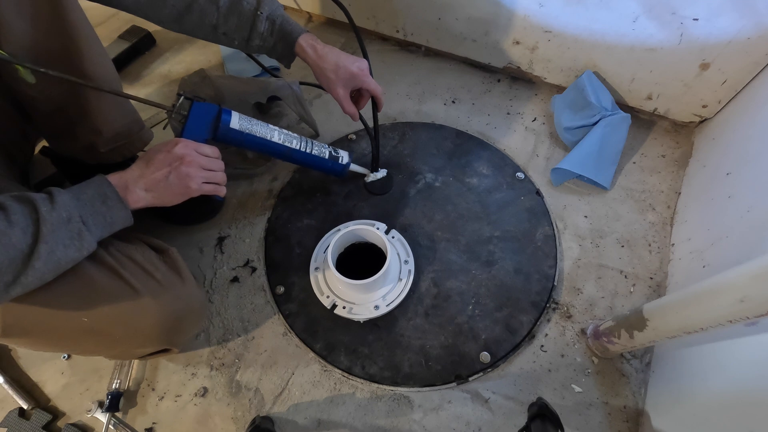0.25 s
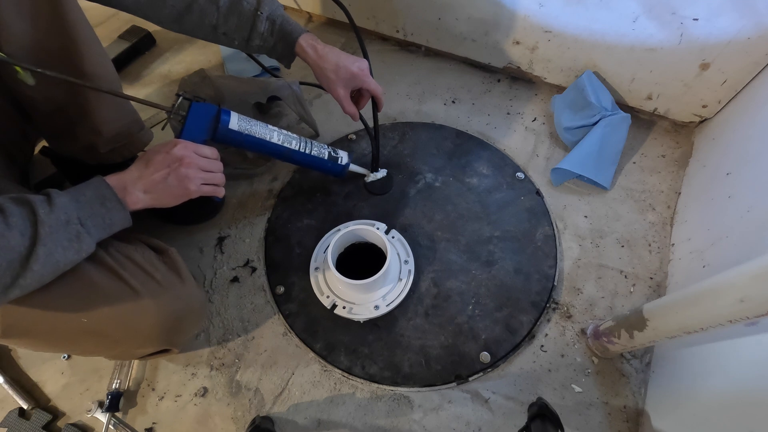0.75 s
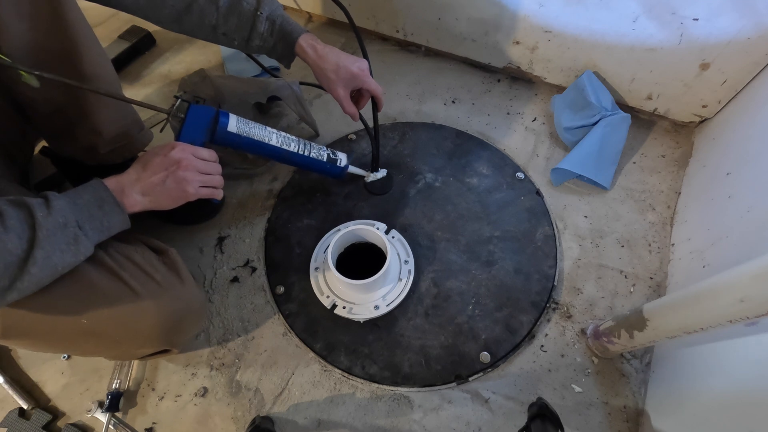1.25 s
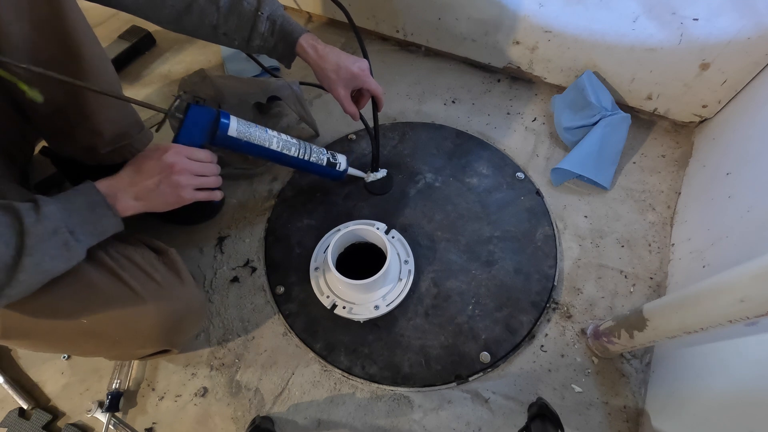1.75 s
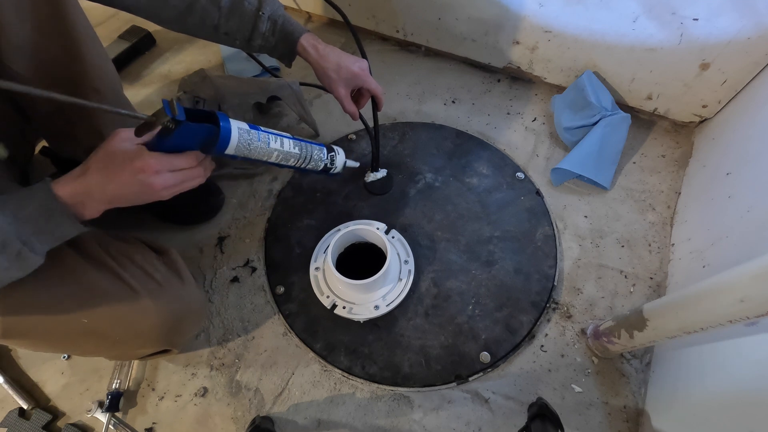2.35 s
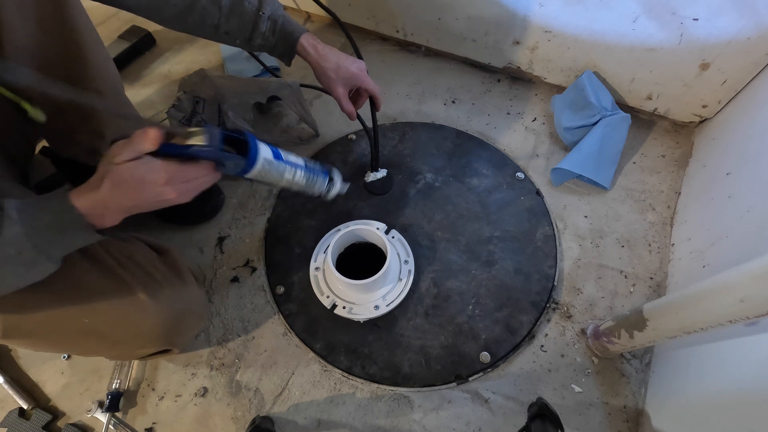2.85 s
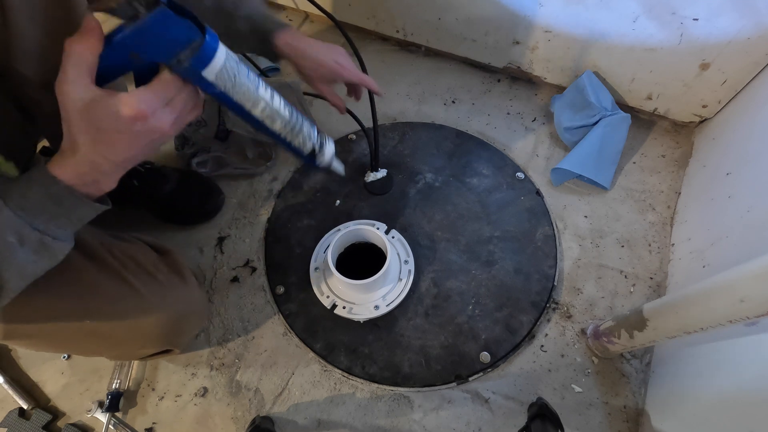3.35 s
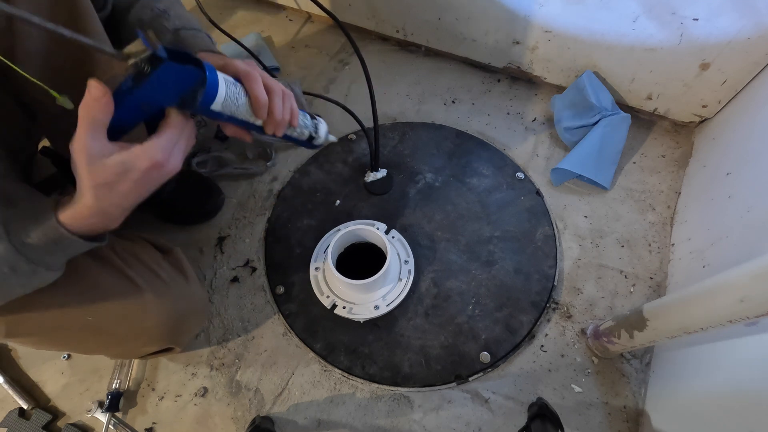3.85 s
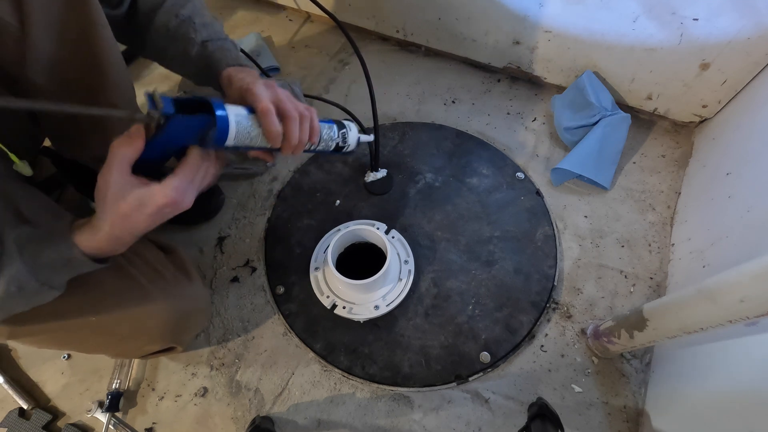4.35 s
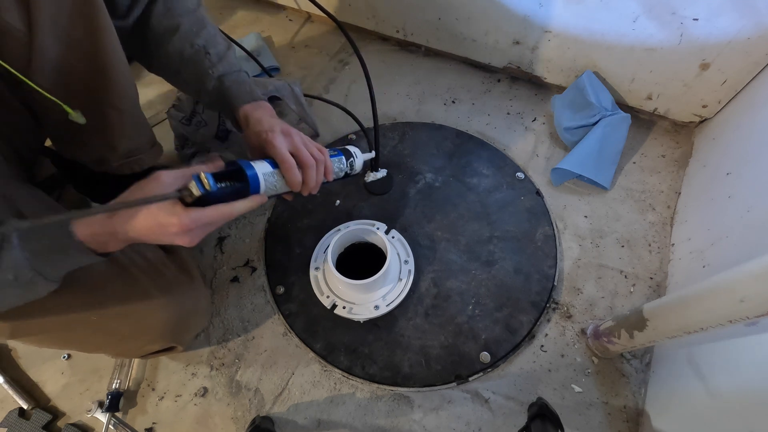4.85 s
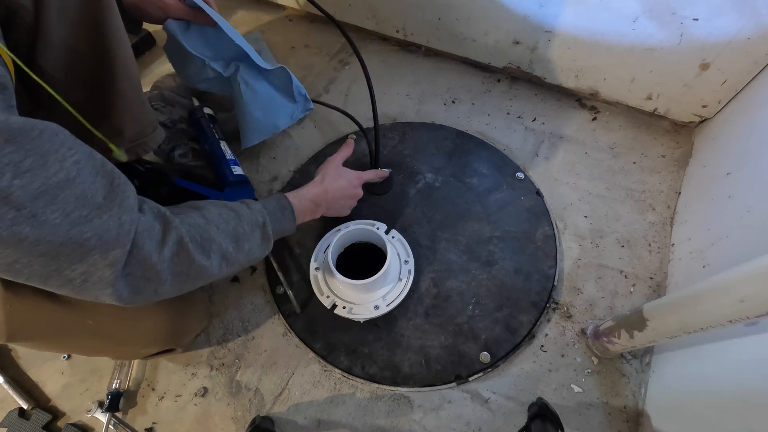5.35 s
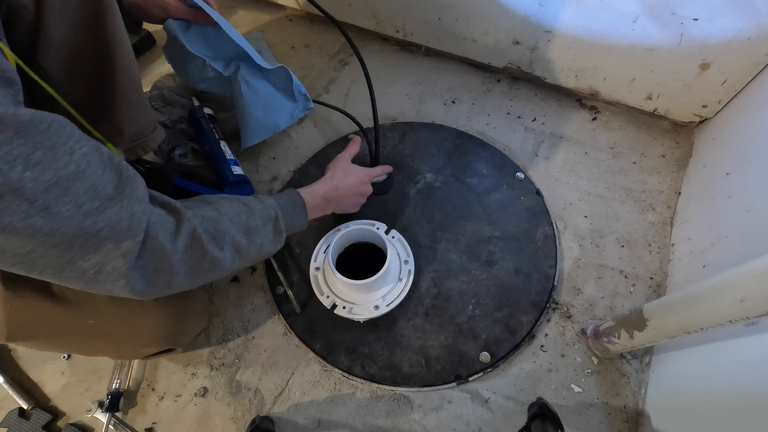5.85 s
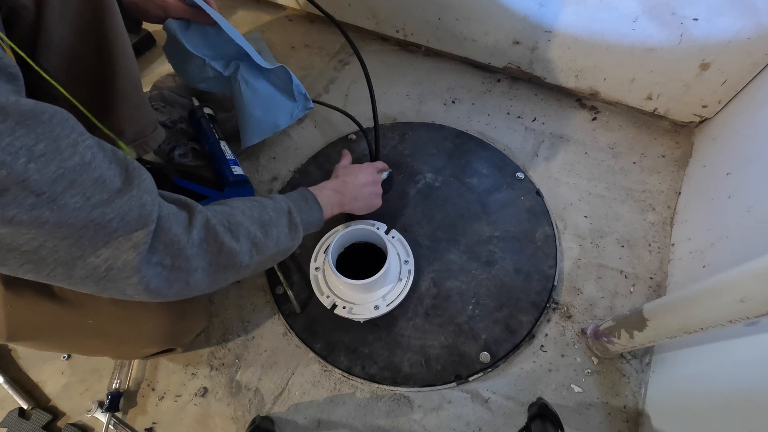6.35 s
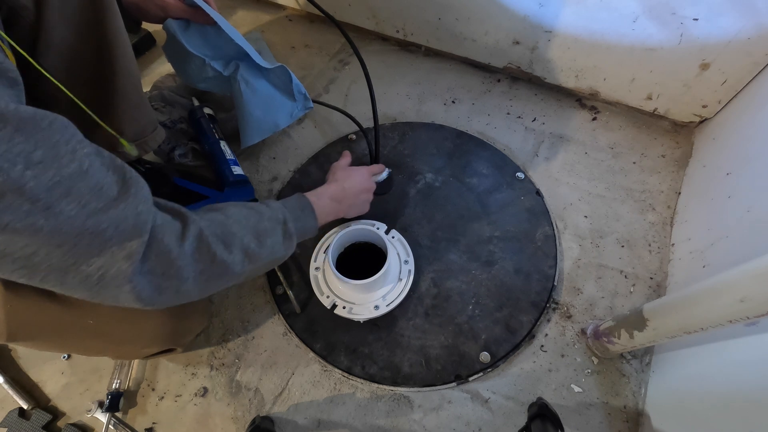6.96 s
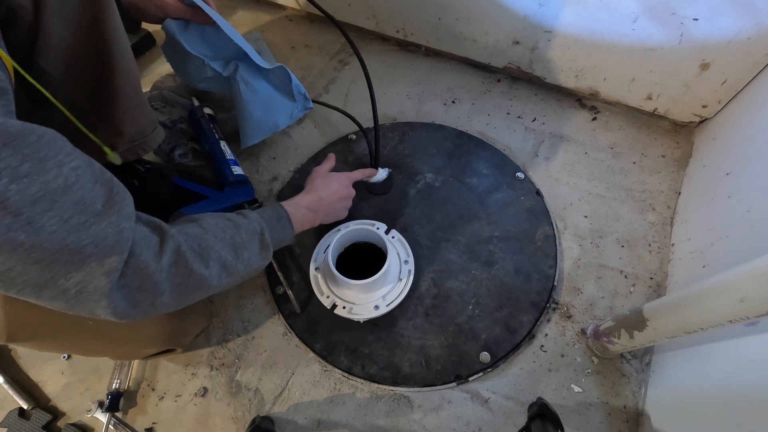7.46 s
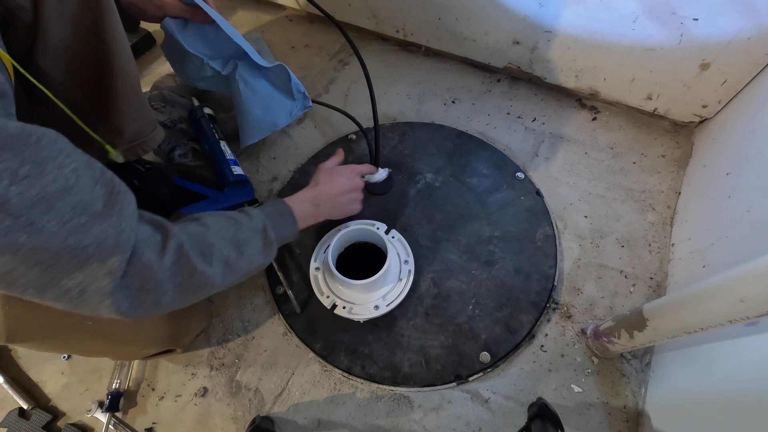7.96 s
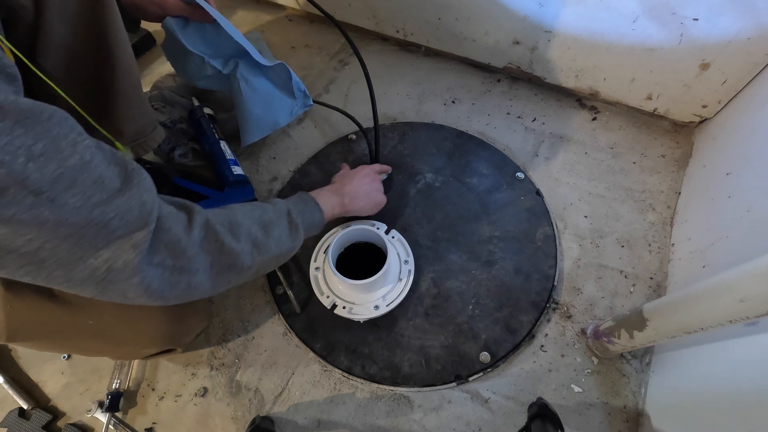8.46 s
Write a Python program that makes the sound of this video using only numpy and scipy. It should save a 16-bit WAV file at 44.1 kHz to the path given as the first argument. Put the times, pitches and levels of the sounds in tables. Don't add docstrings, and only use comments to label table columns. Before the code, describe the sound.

Unsteady low rumble with faint hiss fills a small bare space throughout, heard close up in stereo. During the first 1.6 seconds there are only barely audible ticks and fading cloth rub. At about 1.7 a small steel click sounds, with more light ticks near 1.8 and 2.0 to 2.1 and soft scuffing. Rubbing and metal drag swell towards 2.9, then at 3.0 the gun bumps the hollow lid: a deep, rounded boom with a dull knock. A scrape and tick follow at 3.16, a short skin swish at 3.6 to 3.7, and faint clicks to 4.1. At 4.43 the release lever snaps, by far the sharpest and loudest event, with a low jolt and bright rod jangle; a rebound clacks at 4.63 and smaller ticks settle. At 4.87 everything cuts abruptly to rumble, with tiny ticks around 6.1 to 6.9 and a slightly clearer one at 7.6, ending near 8.7.

```python
import sys
import numpy as np
from scipy import signal
from scipy.fft import rfft, irfft, next_fast_len
from scipy.io import wavfile
from scipy.ndimage import map_coordinates

SR = 44100
rng = np.random.default_rng(int(sys.argv[2]) if len(sys.argv) > 2 else 0)


def to_wav(sig):
    pcm = np.clip(np.atleast_2d(sig), -1, 1) * 32767
    pcm = np.round(pcm).astype(np.int16)
    wavfile.write(sys.argv[1], SR, pcm.T)


def makeup_ratio(level_db):
    decades = np.asarray(level_db, float) / 20
    return 10 ** decades


N = 384111
CHANGE_S = 4.868


def unit(x):
    return x / np.sqrt(np.mean(x ** 2) + 1e-20)


def along(points, hz):
    f, v = np.transpose(points)
    return np.interp(np.log(hz + 1), np.log(f + 1), v)


def wobble(rate):
    knots = rng.standard_normal(int(N * rate / SR) + 4)
    return map_coordinates(knots, [np.arange(N) * rate / SR])


def filtered(x, response):
    n = x.shape[-1]
    m = next_fast_len(n + 8192)
    return irfft(rfft(x, m) * response(np.fft.rfftfreq(m, 1 / SR)), m)[..., :n]


def body(peaks):
    def response(f):
        total = 0
        for k, (centre, width, db) in enumerate(peaks):
            resonance = 1j * f * width / (centre * centre - f * f + 1j * f * width)
            total = total + (-1) ** k * makeup_ratio(db) * resonance
        return total
    return response


def bands(peaks):
    def response(f):
        power = 0
        for centre, width, db in peaks:
            power = power + makeup_ratio(2 * db) / (1 + (2 * (f - centre) / width) ** 2) ** 1.5
        return np.sqrt(power)
    return response


def noise(response, alike, size=N):
    def mid_side(hz):
        turn = np.arccos(np.clip(along(alike, hz), -1, 1)) / 2
        return response(hz) * [np.cos(turn), np.sin(turn)]
    mid, side = filtered(rng.standard_normal((2, size)), mid_side)
    return unit(np.array([mid + side, mid - side]))


def coloured(points):
    return lambda f: makeup_ratio(along(points, f))


def add(out, s, x):
    i = round(s * SR)
    out[:, i:i + x.shape[-1]] += np.atleast_2d(x)[:, :N - i]


def ring(modes, t, attack, scale=1):
    sines = 0
    for hz, db, t60 in modes:
        sines = sines + makeup_ratio(db - 60 * t / (t60 * scale)) * np.sin(2 * np.pi * hz * t)
    return sines * (1 - np.exp(-t / attack))


def stroke(peak_s, db, swell_s, fade_s):
    late = np.arange(N) / SR - peak_s
    return makeup_ratio(db - 20 * np.where(late < 0, -late / swell_s, late / fade_s))


# start_s, level_db, edge_db (re knock), pitch_hz
LEVER_TAPS = [(0.099, -68, 5, 1040), (0.175, -56.5, -22, 2820), (0.344, -58.5, -21, 774),
              (0.434, -68, 7, 751), (1.716, -33.5, 0.5, 1630), (1.806, -42.5, -4.5, 2100),
              (2.014, -40, 3, 2820), (2.044, -50, -1, 2160), (2.062, -51, 3, 2150), (2.115, -47, -5, 2460),
              (3.163, -39.5, -2, 2770), (3.479, -71, 8, 830), (3.514, -66.5, -17, 2050),
              (3.602, -66, 1, 1070), (3.777, -49.5, -21, 2240), (3.837, -55, 3, 2260),
              (4.066, -42, -15, 2250), (4.677, -25, -3.5, 1162), (4.785, -45, -11, 886),
              (6.099, -73.5, 10, 2100), (6.251, -74, 12, 2100), (6.389, -65, -18.5, 888),
              (6.929, -79, 11, 2100), (7.631, -55.5, -11, 1450)]
# start_s, level_db, edge_db, pitch_hz, t60_s
ROD_KNOCKS = [(1.669, -35.5, -11.5, 1410, .021), (1.688, -52.5, -5, 880, .025), (4.404, -45, -4, 2100, .02),
              (4.415, -30, -3, 2000, .05), (4.4215, -12.5, -7, 904, 0.025), (4.4237, -17, -3, 1210, .02),
              (4.4261, -17.5, 17, 900, .009), (4.4272, -17, 16, 2050, .009), (4.430, -17, 2.5, 2050, .022),
              (4.4405, -30, 3, 2097, .03), (4.629, -16.5, -5, 2110, .016), (4.6298, -24, -6, 4120, .014),
              (4.6394, -24, -12, 2110, .02), (4.656, -36, -9, 2110, .04), (4.797, -36.5, -10, 3120, .022)]
# pitch_hz, width_hz, level_db
FRAME_MODES = [(775, 80, -4), (904, 60, -3), (1210, 80, -4), (1460, 110, -3), (1630, 90, -3), (2110, 80, 0),
               (2250, 130, -4), (2460, 150, -5), (2820, 110, -3), (3060, 120, -4), (3280, 130, -7),
               (4120, 160, -9)]
# pitch_hz, width_hz, level_db
PLATE_MODES = [(4600, 250, -8.5), (5110, 310, -3), (6820, 800, 1.5), (7950, 270, -10), (8900, 500, -13.5),
               (11170, 900, -15), (12600, 1300, -15)]
TAP_T60_S, LEVER_HZ, GUIDE_HZ = 0.031, 2135.5, 2900
SHARED_DB = -4
BLOW = 1.2
PLATE_TOP_HZ = 14800


def steel_contacts():
    out, t = np.zeros((2, N)), np.arange(SR // 8) / SR
    contacts = [(*row, TAP_T60_S, LEVER_HZ) for row in LEVER_TAPS]
    contacts += [(*row, GUIDE_HZ) for row in ROD_KNOCKS]

    def plates(f):
        u = f / PLATE_TOP_HZ
        return body(PLATE_MODES)(f) / (1 - u ** 2 + 1.3j * u) ** 2

    for s, db, edge_db, hz, t60, shared_hz in contacts:
        burst = rng.standard_normal((3, len(t))) * makeup_ratio(-60 * t / t60) * (1 - np.exp(-t / 0.00013))
        near = []
        for centre, width, level in FRAME_MODES:
            own_db = -30 * abs(np.log2(centre / hz))
            common_db = SHARED_DB - 27 * abs(np.log2(centre / shared_hz))
            near.append((centre, width, level + max(own_db, common_db)))

        def frame(f):
            notes = body(near)(f) + body([(2100, 2200, -19)])(f)
            return notes / (1 + 1j * f / 5500) ** 3 * (f / (f - 520j)) ** 4

        knock = filtered(burst[0] + BLOW * np.linalg.norm(burst[0]) * (t == 0), frame)
        crack = burst[1] + .6 * np.linalg.norm(burst[1]) * (t == 0)
        edge = filtered(crack * makeup_ratio([[1.5], [-1.5]]) + .22 * burst[2] * [[1], [-1]], plates)
        knock = makeup_ratio([[.4], [-.4]]) * knock / abs(knock).max()
        edge = makeup_ratio(edge_db) * edge / abs(edge).max()
        add(out, s, makeup_ratio(db) * (knock + edge))
    return out


# start_s, level_db
SETTLING = [
    (4.428, -34.5),
    (4.46, -40),
    (4.55, -44),
    (4.622, -48.5),
    (4.701, -58),
    (4.78, -75.5),
]
# pitch_hz, width_hz, level_db
CHATTER_BANDS = [(975, 50, -4), (1720, 60, -2), (2050, 250, -2), (2600, 350, -3), (3500, 1200, -11.5),
                 (4750, 260, 0), (5370, 140, 0.5), (6100, 600, -7), (6897, 446, -1.5), (7500, 400, -8),
                 (8900, 630, -11.5), (11000, 495, -18), (12300, 1497, -21)]
# pitch_hz, level_db, t60_s
ROD_MODES = [(980, -10, 0.91), (1710, -6, 0.74), (2110, 0, 0.32), (2245, -3.5, 0.44), (2570, -2.5, 0.41),
             (3940, -15, 0.59), (4818, -15, 8.5), (5470, -7, 3.6), (5852, -8, 0.54), (6702, -11, 5.0),
             (6923, -3.5, 0.48), (7192, -11.5, 0.8), (8441, -16.5, 0.46), (8800, -13, 0.54),
             (11084, -12, 0.22), (11890, -17.5, 0.35)]


def rod_jangle():
    s, db = np.transpose(SETTLING)
    out, t = np.zeros((2, N)), np.arange(round((s[-1] - s[0]) * SR)) / SR
    chatter = noise(bands(CHATTER_BANDS), [(1000, 0.94), (9000, 0.82)], size=len(t))
    chatter = makeup_ratio(2.6 * wobble(220)[:len(t)]) * chatter
    level = makeup_ratio(np.interp(t + s[0], s, db) + [[1.1], [-1.1]])
    add(out, s[0], level * (chatter + makeup_ratio(-5) * ring(ROD_MODES, t, .002, 3)))
    return out


# start_s, pitch_hz, level_db, t60_s
SPRING_NOTES = [
    (3.163, 13100, -68, .25),
    (4.395, 7950, -44, .3),
    (4.43, 975, -52, .9),
]


def spring():
    out, t = np.zeros((2, N)), np.arange(SR // 2) / SR
    for s, hz, db, t60 in SPRING_NOTES:
        add(out, s, ring([(hz, db, t60)], t, .012))
    return out


# start_s, pitch_hz, level_db, t60_s, rise_s
BOOM_NOTES = [
    (3.002, 58, -5, 0.289, 0.0073),
    (3.0195, 38, -11, 0.4, 0.0088),
    (3.002, 116, -16.5, 0.13, 0.0028),
    (3.002, 334, -38.5, 0.32, 0.0021),
    (3.092, 44.5, -22.5, 0.31, .01),
    (0.38, 770, -56, .08, .002),
]


def booms():
    out, t = np.zeros((2, N)), np.arange(SR // 2) / SR
    for s, hz, db, t60, rise in BOOM_NOTES:
        add(out, s, ring([(hz, db, t60)], t, rise))
    return out


# start_s, level_db, t60_s
LID_BLOWS = [
    (2.997, -25, 0.038),
    (3.010, -22, 0.044),
    (3.02, -37.5, 0.25),
]
# pitch_hz, width_hz, level_db
LID_MODES = [(332.5, 17, -4.5), (486, 35, 4), (932, 58, -7), (1110, 90, -12), (1303, 94, -9),
             (1895, 160, -18), (2520, 390, -20.5), (5200, 720, -25)]


def lid_thuds():
    out, t = np.zeros((2, N)), np.arange(SR // 2) / SR
    for s, db, t60 in LID_BLOWS:
        puff = noise(np.ones_like, [(500, 0.92)], size=len(t)) * makeup_ratio(-60 * t / t60)
        puff = filtered(puff, lambda f: body(LID_MODES)(f) / (1 + 1j * f / 6000) ** 2)
        add(out, s, makeup_ratio(db + 4.5) * puff / abs(puff).max())
    return out


# start_s, level_db, rise_s, left_right_db
JOLTS = [
    (4.4285, -2, .0011, -8),
]


def jolt():
    out, t = np.zeros((2, N)), np.arange(SR // 2) / SR
    for s, db, rise, pan_db in JOLTS:
        u = t / rise
        push = u ** 2 * (1 - .27 * u) * np.exp(-u)
        add(out, s, makeup_ratio(db + pan_db * np.array([[.5], [-.5]])) * push)
    return out


# peak_s, rub_db, brush_db (re rub), swell_s, fade_s
RUB_STROKES = [(0.0, -75, -2.3, .1, .34), (0.92, -85, 0.5, 0.22, .4), (1.712, -60, -4.5, 0.071, .25),
               (1.9, -68, -1, .3, .55), (2.1, -64, -5.5, 0.64, .4), (2.44, -75, -3, 1.2, .06),
               (2.67, -82.5, 4.5, .04, .6), (2.864, -66, 4, .22, .45), (2.96, -67, 0, 0.33, .06),
               (3.04, -57, -13, .03, .08), (3.158, -56, -5, .04, .03), (3.175, -70.5, -1, .12, .11),
               (3.49, -86, 8, 0.17, .6), (3.76, -76.5, -2, 0.13, 1.8), (4.25, -72.5, 2.5, 0.056, 1.2),
               (4.39, -68, 1.5, 0.31, .04), (4.715, -69, -10, 0.027, .15), (4.81, -72, 0.35, .2, .22),
               (8.7, -86, 2.5, .45, .1)]
# pitch_hz, level_db
SCUFF_COLOUR = [(440, -41), (750, -11), (851, -11.5), (1350, -0.5), (1510, -8), (2040, -2.5), (3400, -16.5),
                (4420, -44.5), (7480, -120)]
# pitch_hz, level_db
BRUSH_COLOUR = [(1760, -32), (3000, -3.5), (3540, -8.5), (4790, -2.5), (6450, -3.5), (7020, -1), (8170, -9),
                (12300, -16.5), (13100, -19.5), (14500, -33)]


def rubbing():
    t, near = np.arange(N) / SR, [(1000, .75), (9000, .65)]
    dull = noise(coloured(SCUFF_COLOUR), near) * makeup_ratio(2.2 * wobble(120) + 1.1 * wobble(25))
    bright = noise(coloured(BRUSH_COLOUR), near) * makeup_ratio(2.2 * wobble(160) + 1.5 * wobble(30))
    rub, brush = np.zeros(N), np.zeros(N)
    for s, db, brush_db, swell_s, fade_s in RUB_STROKES:
        same_side = (t < CHANGE_S) == (s < CHANGE_S)
        power = (stroke(s, db, swell_s, fade_s) * same_side) ** 2
        rub += power
        brush += power * makeup_ratio(2 * brush_db)
    return np.sqrt(rub) * dull + np.sqrt(brush) * bright


# peak_s, level_db, swell_s, fade_s
DRAG_STROKES = [(2.82, -69, .18, .15), (2.868, -54.5, 0.048, .09), (2.895, -56, .05, .06),
                (2.96, -58.5, .12, 0.034), (3.168, -48, 0.042, 0.029), (3.19, -68, .03, 0.081),
                (2.03, -60.5, 0.022, 0.11), (3.785, -66, .005, 0.037), (3.85, -71, .01, .08),
                (4.075, -57.5, .005, 0.067)]


def drag():
    note = noise(bands([(2123, 120, -0.5), (2590, 510, -11.0)]), [(2000, 0.76)])
    return np.sqrt(sum(stroke(*row) ** 2 for row in DRAG_STROKES)) * note


# start_s, level_db, centre_hz
PALM_SLIDE = [
    (3.595, -94, 6060),
    (3.627, -57, 6122),
    (3.699, -59, 5392),
    (3.715, -66.5, 5300),
    (3.77, -82, 5600),
]


def swish():
    s, db, centre_hz = np.transpose(PALM_SLIDE)
    out, t = np.zeros((2, N)), np.arange(s[0], s[-1], 1 / SR)
    upper = [(7900, 2500, -8), (11500, 3500, -10)]
    open_palm = noise(bands([(6000, 900, 0)] + upper), [(6000, .7)], size=len(t))
    shut_palm = noise(bands([(5200, 1100, 0), (4000, 900, -7)] + upper), [(6000, .7)], size=len(t))
    closed = np.clip((6200 - np.interp(t, s, centre_hz)) / 900, 0, 1)
    grain = 1.3 * wobble(90)[:len(t)]
    level = makeup_ratio(np.interp(t, s, db) + grain + [[.8], [-.8]])
    add(out, s[0], level * (np.sqrt(1 - closed) * open_palm + np.sqrt(closed) * shut_palm))
    return out


# pitch_hz, t60_s
WALL_DECAY = [(300, .35), (2000, 0.35), (6000, .25), (13000, .12)]


def room(x):
    hz, t, z = signal.stft(rng.standard_normal((2, SR // 2)), SR, nperseg=256)
    decay = makeup_ratio(-60 * t / along(WALL_DECAY, hz)[:, None])
    tail = signal.istft(z * decay, SR, nperseg=256)[1]
    late = np.pad(x, ((0, 0), (260, 0)))
    return signal.fftconvolve(late, tail / np.linalg.norm(tail[0]), axes=1)[:, :N]


# start_s, level_db
RUMBLE_STRENGTH = [(0.0, -54.5), (0.58, -50), (1.19, -51), (1.38, -48), (1.94, -47.5), (2.35, -52),
                   (2.74, -47.5), (4.87, -54.5), (5.0, -48), (5.14, -47.5), (5.38, -50.5), (6.11, -46),
                   (7.16, -50), (8.71, -47)]
# pitch_hz, level_db (per Hz)
DEEP_COLOUR = [(7.1, -32), (12, -3), (39, 0), (90, -14), (120, -41), (200, -120)]
HUM_COLOUR = [(35, -31.5), (60, -2), (97, -6), (140, -4), (199, -14.5), (280, -20.5), (320, -31.5),
              (420, -58.5), (700, -120)]
HISS_COLOUR = [(150, -31.5), (260, -2), (283, -3), (366, -14.5), (524, -8.5), (689, -19.5), (803, -26),
               (1060, -19.5), (2200, -31), (2360, -29), (3210, -37.5), (7160, -38.5), (11000, -56),
               (12400, -48.5), (15500, -63.5)]
# pitch_hz, likeness (0 to 1)
LIKENESS = [(60, 0.99), (130, 1), (290, 0.69), (640, .6), (1400, .3), (3100, 0.35), (6800, .4),
            (15000, .05)]
# start_s, depth_db, recovery_s
GAIN_DUCKS = [
    (3.0, -2.5, 2.5),
    (4.43, -7, .6),
]
DUCK_ATTACK_S = .08
DEEP_DB, HUM_DB, HISS_DB = 2.5, -1, -65
HUM_FOLLOWS, HISS_FOLLOWS = .45, .05


def background():
    s, strength_db = np.transpose(RUMBLE_STRENGTH)
    t, mean_db = np.arange(N) / SR, strength_db.mean()
    swing = np.interp(t, s, strength_db) - mean_db
    duck = np.zeros(N)
    for start, db, recovery_s in GAIN_DUCKS:
        since = np.clip(t - start, 0, None)
        duck += db * (1 - np.exp(-since / DUCK_ATTACK_S)) * np.exp(-since / recovery_s)
    duck *= t < CHANGE_S
    surge = 1.1 * wobble(6) + 1.4 * wobble(13)
    deep_db = mean_db + DEEP_DB + swing + surge + 1.4 * wobble(9.4)
    hum_db = mean_db + HUM_DB + HUM_FOLLOWS * swing + duck + 0.87 * surge + 0.57 * wobble(7.2)
    hiss_db = HISS_DB + HISS_FOLLOWS * swing + duck + .3 * surge
    deep = makeup_ratio(deep_db) * noise(coloured(DEEP_COLOUR), LIKENESS)
    hum = makeup_ratio(hum_db) * noise(coloured(HUM_COLOUR), LIKENESS)
    return deep + hum + makeup_ratio(hiss_db) * noise(coloured(HISS_COLOUR), LIKENESS)


def scene():
    t = np.arange(N) / SR
    before = t < CHANGE_S
    hits = steel_contacts()
    early = (hits + rod_jangle() + spring() + booms() + lid_thuds() + jolt()) * before
    wet = makeup_ratio(-14) * room(hits * before) * before
    handling = rubbing() + swish() + drag()
    join = 1 - 0.96 * np.exp(-((t - CHANGE_S) / 0.0042) ** 2)
    return (early + wet + hits * ~before + handling + background()) * join


def roll_off(x):
    return signal.sosfilt(signal.butter(12, 15610, fs=SR, output="sos"), x)


def record(dry):
    x = dry / (1 + abs(dry / 1.5) ** 6) ** (1 / 6)
    x = filtered(x, lambda f: 1 / np.sqrt(1 + (f / 13700) ** 20))
    return roll_off(x)


dry = scene()
out = record(dry)
to_wav(out)
```